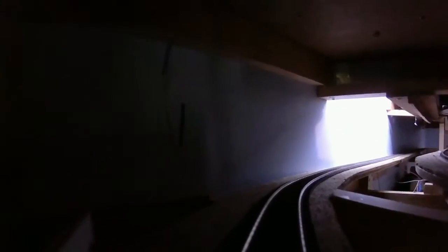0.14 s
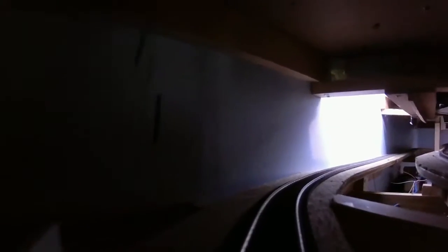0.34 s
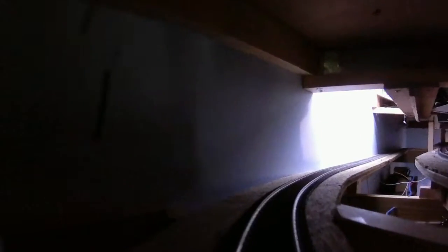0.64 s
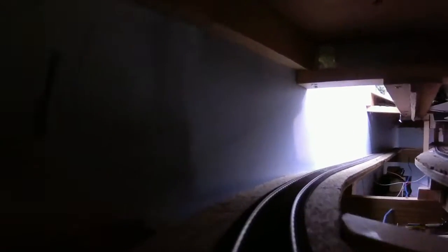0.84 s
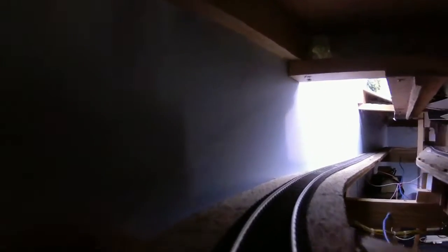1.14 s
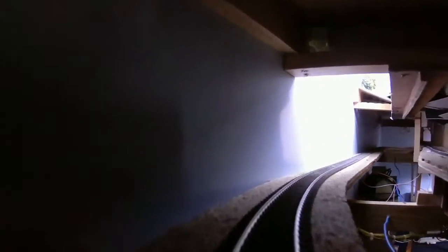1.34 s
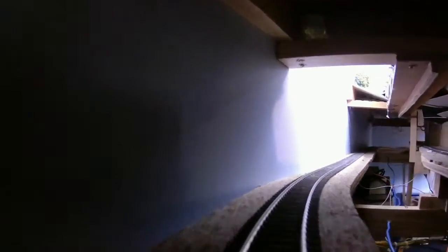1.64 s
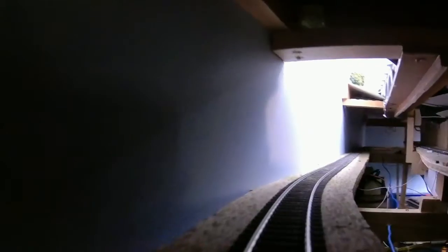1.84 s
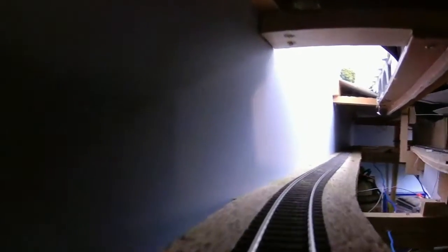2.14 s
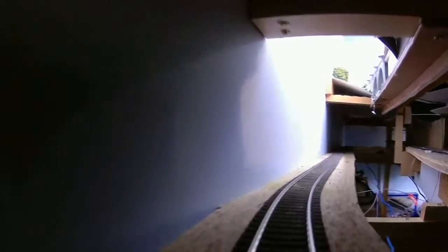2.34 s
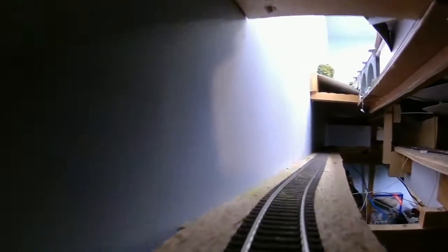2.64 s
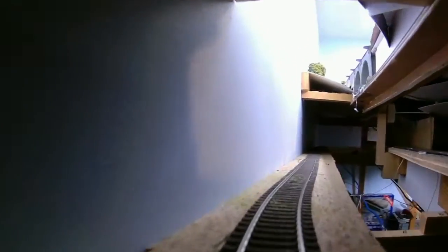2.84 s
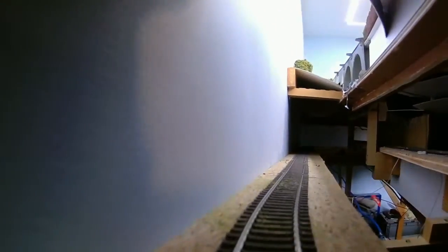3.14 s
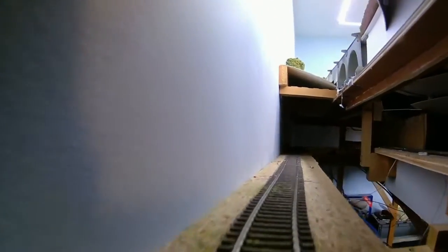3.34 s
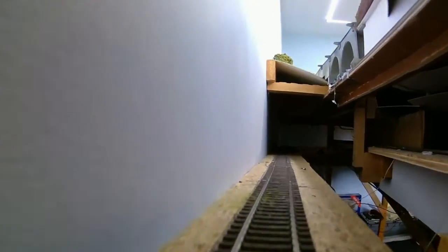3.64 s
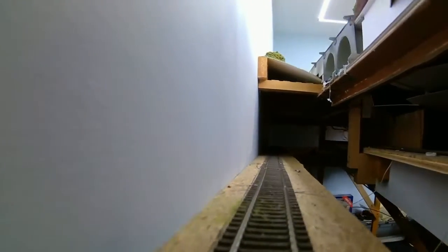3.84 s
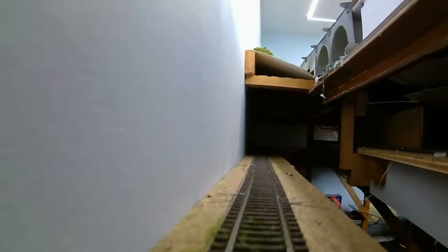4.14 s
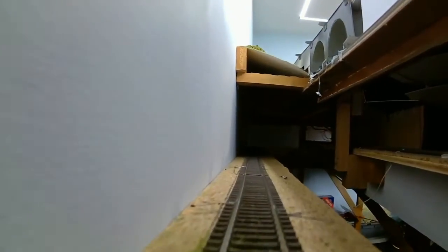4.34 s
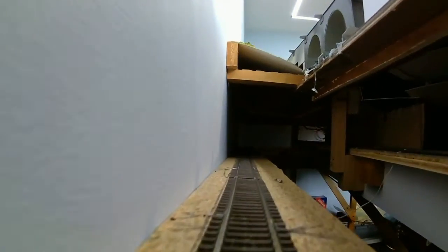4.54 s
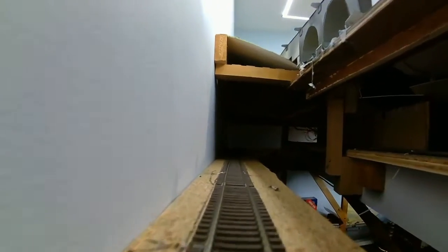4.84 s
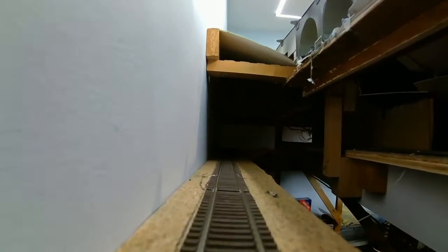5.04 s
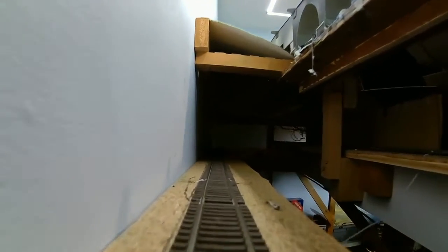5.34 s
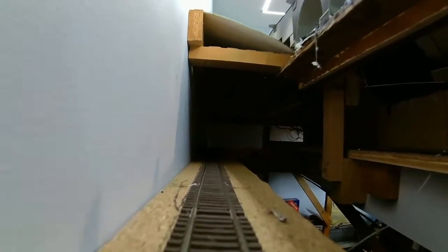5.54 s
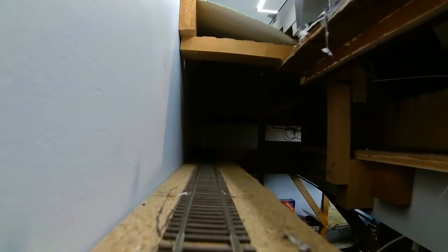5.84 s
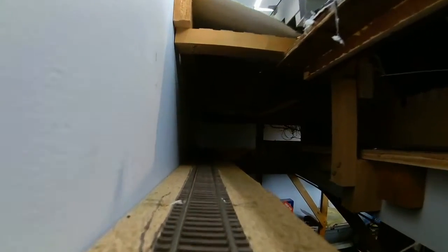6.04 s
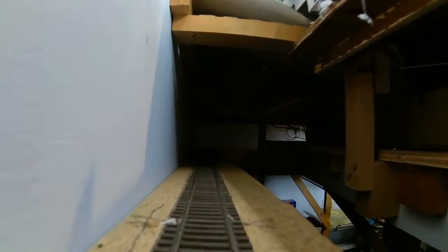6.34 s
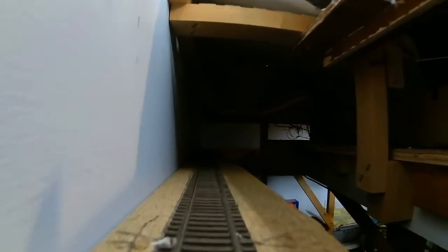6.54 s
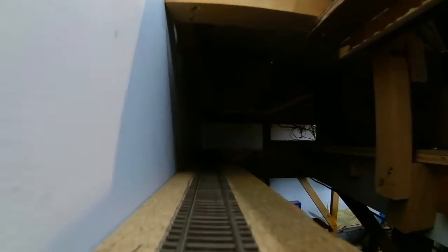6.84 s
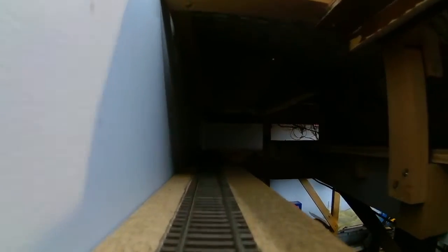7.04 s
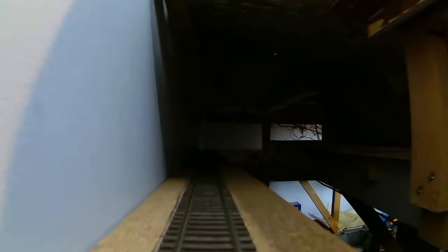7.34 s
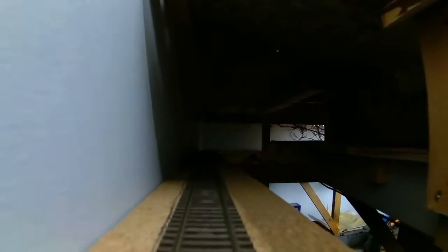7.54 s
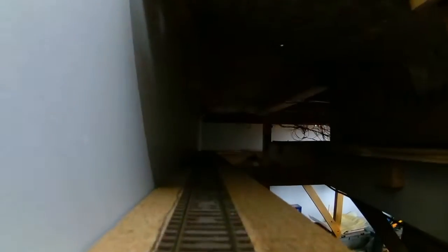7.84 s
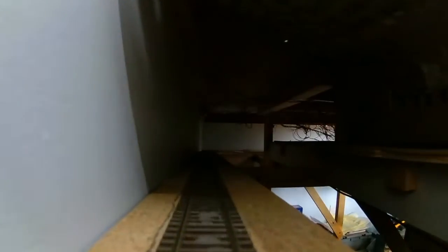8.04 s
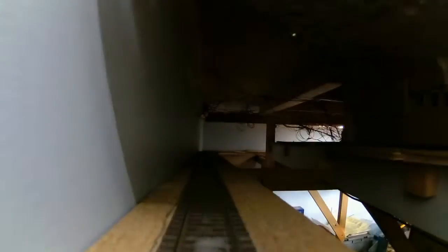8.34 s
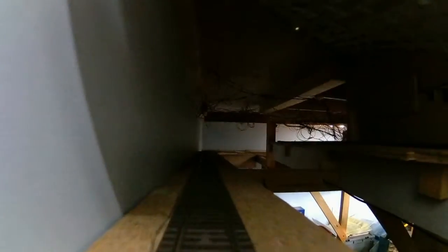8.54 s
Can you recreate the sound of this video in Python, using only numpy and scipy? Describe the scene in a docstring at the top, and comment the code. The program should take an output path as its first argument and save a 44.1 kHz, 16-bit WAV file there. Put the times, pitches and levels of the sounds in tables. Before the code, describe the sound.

From a microphone riding on a model train, the drive makes a rapid gritty scrape, a hard stroke then a softer one, about twelve times a second and rising to seventeen. A low knock grows and peaks near three seconds. Scattered squeaks bunch up from four to five and a half seconds, then thin out. Faint wheel rumble, tiny grit cracks, and close echoes from wall and timbers continue throughout.

```python
"""The drive of a model train scrapes twice a turn, hard then soft, as it gathers speed on a baseboard.
The scrapes are gritty noise that rings every part of the train, with a metallic fizz above them.
Slack knocks once a turn through the motor mount, and some hard scrapes squeak as short wavering tones.
Wheels rumble as filtered noise, grit cracks in short noise bursts, and wall and timbers echo the scrapes.
The microphone rides on the train."""
import sys
import numpy as np
from scipy import signal
from scipy.fft import rfft, irfft, next_fast_len
from scipy.io import wavfile

SR = 44100
rng = np.random.default_rng(int(sys.argv[2]) if len(sys.argv) > 2 else 0)


def transcribe(signal):
    """Save signal, clipped to [-1, 1], as a 16-bit WAV file at the path in sys.argv[1]."""
    frames = np.atleast_2d(signal).T
    limited = np.clip(frames, -1, 1)
    pcm = np.round(limited * 32767).astype(np.int16)
    wavfile.write(sys.argv[1], SR, pcm)


N = 383669
TIME = np.arange(N) / SR  # seconds
HZ = np.fft.rfftfreq(4096, 1 / SR)  # frequency grid of the filters

# Wheels on rail, level before trim: start_s, level_db
ROLL = [(0, -39), (.7, -45.5), (1.6, -42), (2.4, -43.5), (3.2, -41.5), (4.3, -41.5), (5.2, -46.5),
        (5.9, -48), (7.3, -47), (8.7, -42)]
# Tone of the rolling wheels: frequency_hz, relative_level_db
ROLLING = [(20, -23), (90, -20), (172, -30), (225, 1.5), (300, 3), (480, -3), (700, -1.5), (1500, -7),
           (3000, -27), (8000, -35)]
# Grit cracking under a wheel, crest before the noise is applied: start_s, level_db
TICKS = [(0.8679, -34), (1.9494, -34), (2.9343, -32), (4.033, -32), (5.2732, -20.5), (7.777, -30),
         (8.1394, -37), (8.1524, -33), (8.311, -35)]

# Speed of the drive shaft: time_s, speed_turns_per_s
SPEED = [(0.0, 12.09), (0.45, 12.29), (2.5, 14.18), (3.8, 14.62), (5.0, 14.48), (5.5, 14.82), (5.65, 13.94),
         (6.5, 15.02), (7.15, 16.33), (7.6, 16.3), (8.4, 17.14), (8.7, 17.1)]
START_TURN = 0.117  # shaft turns
# Where the wheel presses hardest, slipping along the way: time_s, position_shaft_turns
WHEEL = [(0, 1.95), (2.7, 1.56), (5.2, 1.72), (5.5, 2.37), (7, 2.65), (8.7, 2.8)]
GEAR_RATIO = 3  # shaft turns per wheel turn

# Slack taken up once a turn, level before trim: time_s, level_db
KNOCK = [(0, -50.5), (.4, -44.5), (1.9, -31.5), (2.8, -23.5), (3.8, -26), (5.1, -30), (5.8, -36),
         (6.9, -34), (8.7, -38.5)]
# Broad tone of the knock: frequency_hz, relative_level_db
THUD = [(175, -31.5), (225, 2), (500, 5), (900, -20.5)]
# Resonances of the motor mount before drift: pitch_hz, width_hz, relative_level_db
MOUNT = [(360.6, 23, 7.5), (264, 88, -17), (460, 50, -17)]
# Drift of the mount's notes: time_s, shift_hz
MOUNT_DRIFT = [(0, -4), (3, 6), (5.6, -10), (8.7, 2)]

# Loud squeaks, crest before trim and pitch before waver: crest_s, level_db, pitch_hz
SQUEAKS = [(1.571, -4.5, 1583), (1.875, -4, 1720), (2.308, -6.5, 1444), (2.799, -4.5, 1359),
           (2.935, -3.5, 1349), (4.178, -0.5, 1377), (4.31, -2.5, 1418), (4.516, -1.5, 1516),
           (4.589, -8, 1412), (4.998, 0, 1378), (5.069, -2.5, 1396), (5.275, -2, 1405), (5.418, -5.5, 1335),
           (5.545, -1.5, 1453)]
# Over this stretch the drive binds and every hard scrape squeaks; elsewhere only this share does
BIND_FROM_S, BIND_TO_S, CATCH_SHARE = 4.15, 5.3, 0.12
# Lesser squeaks: typical crest before trim while binding and while free, and its scatter (all dB)
BIND_DB, FREE_DB, SQUEAK_SCATTER_DB = -8.5, -15.5, 2.5
# Their typical pitch before waver (Hz) and its scatter (share of the pitch)
SQUEAK_HZ, SQUEAK_SPREAD = 1410, 0.03

# How hard the drive rubs: time_s, force_db
FORCE = [(0, -21.5), (1.3, -22), (1.8, -17.5), (2.65, -18), (3.6, -19), (4.2, -16.5), (5.28, -15.5),
         (5.6, -18.5), (6.2, -19.5), (8, -19.5), (8.7, -21)]
# Resonances of the baseboard: pitch_hz, width_hz, relative_level_db
BASEBOARD = [(576, 91, -4.5), (625.6, 66, 1.5)]
# Resonances of the track bed: pitch_hz, width_hz, relative_level_db
TRACK_BED = [(781, 68, -5), (834, 92, -5), (901, 75, -5)]
# Resonances of the chassis: pitch_hz, width_hz, relative_level_db
CHASSIS = [(1041, 82, -3.5), (1147, 105, -0.2)]
# Resonances of the shell: pitch_hz, width_hz, relative_level_db
SHELL = [(1326, 153, 2.5), (1419, 75, 0.17)]
# Resonances of the roof before drift: pitch_hz, width_hz, relative_level_db
ROOF = [(1549, 111, 2), (1672, 165, -1.5), (1838, 93, -3.5), (1954, 140, -10.5), (2110, 62, -20)]
# Resonances of the gears: pitch_hz, width_hz, relative_level_db
GEARS = [(2453, 260, -9.5), (2677, 150, -5.5), (2948, 340, 0), (3163, 310, 4.5), (3470, 300, 1.5),
         (3610, 280, -1.5)]
# Resonances of the rail: pitch_hz, width_hz, relative_level_db
RAIL = [(4080, 390, 2), (4260, 150, -22)]
# Resonances of the open baseboard span: pitch_hz, width_hz, relative_level_db
SPAN_MODES = [(715, 52, -4), (746, 98, -2.2)]
# Tone of the fizz: frequency_hz, relative_level_db
FIZZ = [(1000, -19.5), (2100, 7.5), (4300, -4.5), (4900, 3), (6000, 1.5), (7800, -1.5)]
# Ring of the baseboard against the drive: time_s, level_db
BASEBOARD_LEVEL = [(0, -17), (1.15, -5), (2.1, -14), (2.8, -10), (3.6, -9), (4.4, -13.5), (8.7, -15.5)]
# Ring of the track bed against the drive: time_s, level_db
TRACK_BED_LEVEL = [(0, -4), (1.2, -15.5), (1.9, -3), (2.4, -6), (2.85, -13), (4.7, -10), (5.5, -1),
                   (6.65, -13), (7.1, -2.5), (8.7, -4)]
# Ring of the chassis against the drive: time_s, level_db
CHASSIS_LEVEL = [(0, -7.5), (.85, -19), (2.3, -8), (2.85, -17.5), (4.35, -6), (5.05, -16.5), (5.7, -4),
                 (8.7, -8.5)]
# Ring of the shell against the drive: time_s, level_db
SHELL_LEVEL = [(0, -10.5), (1.7, -11), (2.4, -2.5), (2.9, -7), (3.2, -6.5), (4, -7.5), (4.4, -3.5),
               (5.149, -0.8), (6.4, -7), (7.3, -6.5), (8.1, -9.5)]
# Ring of the roof against the drive: time_s, level_db
ROOF_LEVEL = [(0, -4.5), (.7, -10), (1.2, -4), (2, -8), (4, -7), (5.8, -7), (6.8, -5), (8.7, -6)]
# Ring of the gears against the drive: time_s, level_db
GEARS_LEVEL = [(0, -12.5), (.8, -9), (2.9, -13.5), (3.55, -8), (5.4, -10.5), (6.5, -8.5), (8.7, -8)]
# Wheel flanges rubbing the rail, against the drive: time_s, level_db
FLANGE = [(0, -17), (1.6, -12), (2.3, -19), (3.2, -16), (4.3, -18.5), (5.4, -24.5), (7, -19.5),
          (8.7, -18.5)]
# Boom of the open span of baseboard, against the drive: time_s, level_db
HOLLOW = [(0, -9.5), (1.2, -8.5), (2, -11.5), (3, -9), (4, -16), (5.4, -14), (6.3, -2.5), (7.2, -10),
          (8.7, -3.5)]
# Drift of the roof's notes: time_s, shift_hz
ROOF_DRIFT = [(0, 89.5), (1.5, 29.5), (4, -9.5), (8.7, -20)]
# Soft scrape against the hard one, baseboard to gears in the order of PARTS: level_db
SOFT_DB = [-2, -2.5, -0.5, -6, -12, 0]
# How much each part feels the wheel's wobble, in the order of PARTS: depth_db
WOBBLE_DB = [0.8, 0.75, 0.77, 0.16, 0.6, 2.1]
# Each part's resonances beside its level curve
PARTS = [(BASEBOARD, BASEBOARD_LEVEL), (TRACK_BED, TRACK_BED_LEVEL), (CHASSIS, CHASSIS_LEVEL),
         (SHELL, SHELL_LEVEL), (ROOF, ROOF_LEVEL), (GEARS, GEARS_LEVEL)]

EDGE_HZ = 7900  # top of the microphone's band


def amp(db):
    """Turns decibels into a gain."""
    return 10 ** (np.asarray(db) / 20)


def unit(x):
    """Scales to rms 1."""
    return x / np.sqrt(np.mean(x ** 2) + 1e-20)


def curve(points):
    """Joins points (time_s, value) by straight lines."""
    return np.interp(TIME, *np.transpose(points))


def wander(rate_hz):
    """Smooth random motion of rms 1, fading out above the rate."""
    hz = np.fft.rfftfreq(N, 1 / SR)
    spectrum = rfft(rng.standard_normal(N)) * np.exp(-(hz / rate_hz) ** 2)
    return unit(irfft(spectrum, N))


def shaped(points):
    """Gain drawn through points on a log-frequency axis."""
    hz, db = np.transpose(points)
    return amp(np.interp(np.log(HZ + 1), np.log(hz), db))


def resonant(modes):
    """Gain of a set of steep-sided resonances."""
    peaks = [amp(db) / (1 + (2 * (HZ - hz) / width) ** 2) for hz, width, db in modes]
    return np.sqrt(sum(peak ** 2 for peak in peaks))


def ring(x, gain):
    """Causal minimum-phase filter, scaled to rms 1: it rings after the push, never before."""
    log_gain = np.log(np.maximum(np.r_[gain, gain[-2:0:-1]], 1e-5))
    response = np.fft.ifft(np.exp(signal.hilbert(log_gain).conj())).real
    return unit(signal.oaconvolve(x, response[:len(HZ)])[:N])


def detune(x, drift):
    """Slides every frequency of a sound by a curve in Hz."""
    analytic = signal.hilbert(x, next_fast_len(N))[:N]
    return (analytic * np.exp(2j * np.pi * np.cumsum(curve(drift)) / SR)).real


def wheels(level_db=4, lumpy_db=2.0):
    """A low wash of wheels on rail: filtered noise with a lumpy level."""
    level = amp(curve(ROLL) + level_db + lumpy_db * wander(25))
    return level * ring(rng.standard_normal(N), shaped(ROLLING))


def ticks(decay_s=0.0018):
    """Bright cracks of grit under a wheel: noise that starts at once and dies away fast."""
    bursts = sum(amp(db) * (TIME >= s) * np.exp(-abs(TIME - s) / decay_s) for s, db in TICKS)
    return bursts * ring(rng.standard_normal(N), resonant([(4460, 620, -5), (5850, 3900, -11.0)]))


def surroundings(x, share=0.16, near_s=0.002248, far_s=0.009, drift=0.1154):
    """Four echoes from wall and timbers, whose distances drift as the train moves."""
    delays = np.geomspace(near_s, far_s, num=4)
    echoes = sum(np.interp(TIME - d * (1 + drift * wander(0.337)), TIME, x) for d in delays)
    return (x + share * echoes) / np.sqrt(1 + len(delays) * share ** 2)


def wobble(turns):
    """The load rises and falls (+-1) once a turn of the slightly eccentric wheel."""
    return np.cos(2 * np.pi * (turns - curve(WHEEL)) / GEAR_RATIO)


def knocks(turns, level_db=-4.0, lands=0.29, rattle=0.38, rattle_decay=0.56, wobble_db=3.0):
    """The slack closes with a short push, then rattles in the motor mount (timing in turns)."""
    count, since = np.divmod(turns - lands, 1)
    strength = amp(wobble_db * wobble(turns))
    powers = [amp(db) ** 2 / (1 + (2 * (HZ - hz) / width) ** 2) for hz, width, db in MOUNT]
    mount = shaped(THUD) * np.sqrt(sum(powers))
    push = ring(np.diff(count, prepend=count[0]) * strength, mount)
    shake = ring(rng.standard_normal(N) * strength * np.exp(-since / rattle_decay), mount)
    knock = detune((1 - rattle) * push + rattle * shake, MOUNT_DRIFT)
    return amp(curve(KNOCK) + level_db) * unit(knock)


def catches(turns, before=0.04):
    """Lesser squeaks (crest_s, level_db, pitch_hz) that fall by chance on hard scrapes."""
    times = TIME[1:][np.diff(np.floor(turns + before)) > 0]
    chances = rng.random(len(times))
    scatters = rng.standard_normal((len(times), 2))
    rows = []
    for s, luck, (size, pitch) in zip(times, chances, scatters):
        binding = BIND_FROM_S < s < BIND_TO_S
        taken = any(abs(s - loud[0]) < 0.03 for loud in SQUEAKS)  # a loud squeak is already there
        if not taken and (binding or luck < CATCH_SHARE):
            db = (BIND_DB if binding else FREE_DB) + SQUEAK_SCATTER_DB * size
            rows.append((s, db, SQUEAK_HZ * (1 + SQUEAK_SPREAD * pitch)))
    return rows


def squeaks(turns, level_db=-10.0, rise_s=0.0047, fall_s=0.0073, waver=0.05):
    """A catching surface builds up a brief wavering tone and lets go."""
    out = np.zeros(N)
    bend = 1 + waver * wander(240)
    for s, db, hz in [*SQUEAKS, *catches(turns)]:
        near = slice(*np.searchsorted(TIME, [s - 0.02, s + 0.04]))
        t = TIME[near] - s
        swell = np.exp(-(t / np.where(t < 0, rise_s, fall_s)) ** 2)
        tone = np.sin(2 * np.pi * np.cumsum(hz * bend[near]) / SR)
        out[near] += np.sqrt(2) * amp(db + level_db) * swell * tone  # levels are rms at the crest
    return out


def stroke(turns, centre, width):
    """A bell of contact that comes round once a turn."""
    return np.exp(-0.5 * (((turns - centre + 0.5) % 1 - 0.5) / width) ** 2)


def contacts(turns):
    """Pressure of the hard scrape, which trails off, and of the soft one over half a turn later."""
    hard = stroke(turns, -0.048, 0.082) + 0.17 * stroke(turns, 0.053, 0.041)
    soft = stroke(turns, 0.53, 0.076)
    return hard, soft


def scrapes(turns, force_db, steady=0.26, uneven_db=0.57, own_db=1.56, chatter_db=1.25,
            grit_db=2.0, top_wobble_db=1.43, bite_db=2.0, lead=0.042):
    """Gritty friction, twice a turn, rings every part of the train and fizzes above them."""
    load = wobble(turns)
    grip = amp(uneven_db * wander(22) + chatter_db * wander(330))
    grit = rng.standard_normal(N) * grip * amp(grit_db * wander(3000))

    # The body's narrow resonances answer late, so their pressure starts earlier (lead in turns)
    hard, soft = contacts(turns + lead)
    body = amp(curve(HOLLOW)) * ring(grit * (hard + 0.55 * soft + 0.28), resonant(SPAN_MODES))
    for (modes, level), soft_db, wobble_db in zip(PARTS, SOFT_DB, WOBBLE_DB):
        pressure = np.sqrt(hard ** 2 + (amp(soft_db) * soft) ** 2 + steady ** 2)
        pressure = pressure * amp(wobble_db * load)
        part_level = amp(curve(level) + own_db * wander(48))  # each part rattles a little by itself
        part = part_level * ring(grit * pressure, resonant(modes))
        body += detune(part, ROOF_DRIFT) if modes is ROOF else part

    hard, soft = contacts(turns)
    sharp = grit * amp(top_wobble_db * load + bite_db * wander(500))  # metal bites in finer ticks
    body += amp(curve(FLANGE)) * ring(sharp * (hard + 0.75 * soft + 0.11), resonant(RAIL))
    fizz = ring(sharp * (hard + 0.62 * soft + 0.31), shaped(FIZZ))
    return amp(force_db) * (amp(-1.6) * body + amp(-19.5) * fizz)


def scene():
    """Everything rides with the microphone; only the echoes move."""
    turns = START_TURN + np.cumsum(curve(SPEED)) / SR
    drive = surroundings(scrapes(turns, curve(FORCE)))
    mix = drive + knocks(turns) + squeaks(turns) + ticks() + wheels()
    return mix[None]


def record(dry):
    """A small microphone clips the peaks and passes a narrow band."""
    lowpass = signal.firwin(301, EDGE_HZ, window=("kaiser", 8), fs=SR)
    return signal.oaconvolve(np.clip(dry, -0.95, 0.95), lowpass[None], "same")


dry = scene()
out = record(dry)
transcribe(out)
```